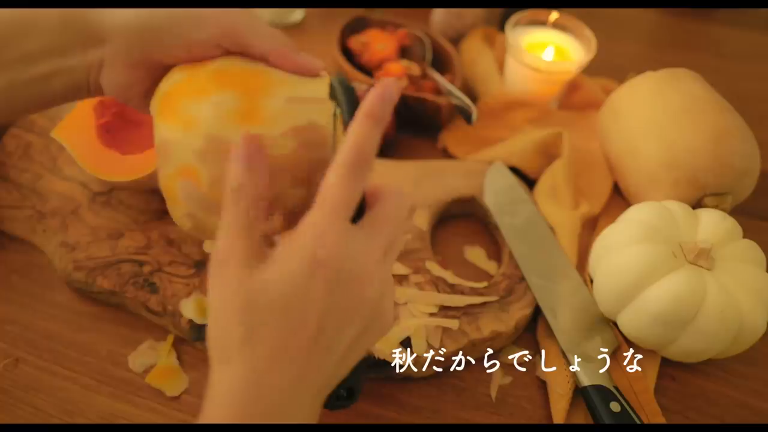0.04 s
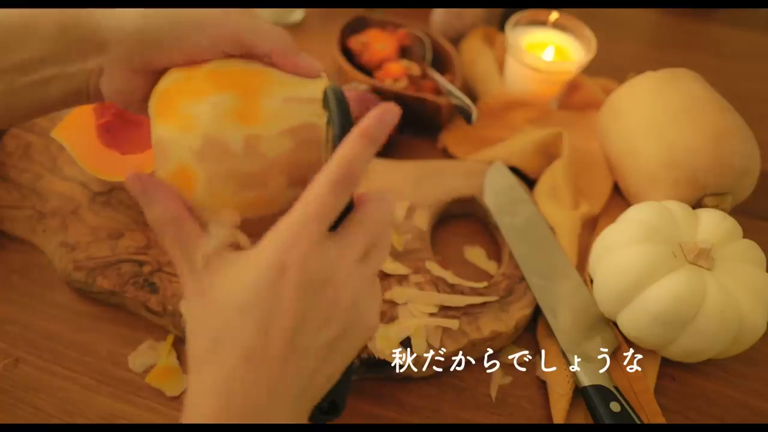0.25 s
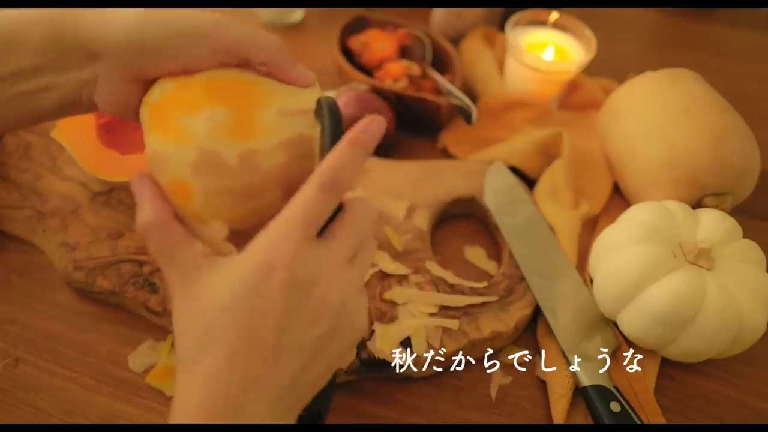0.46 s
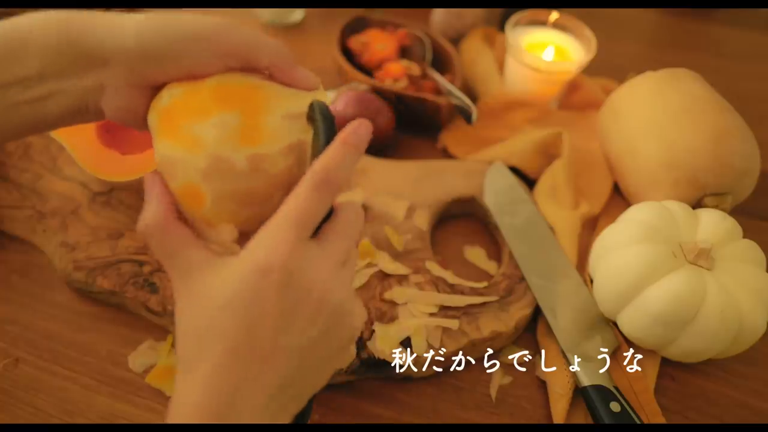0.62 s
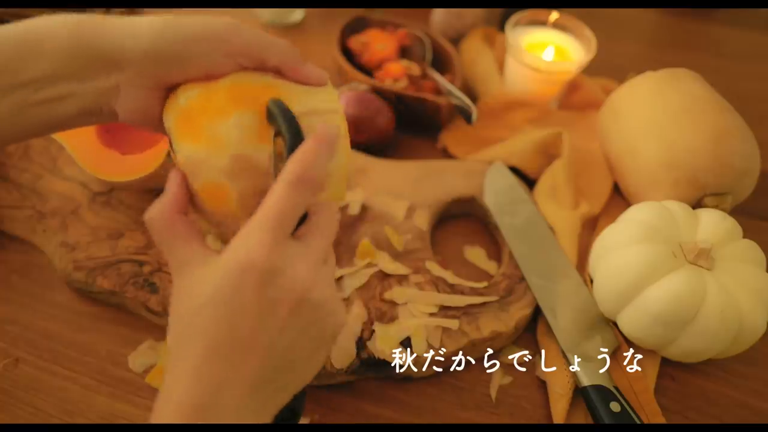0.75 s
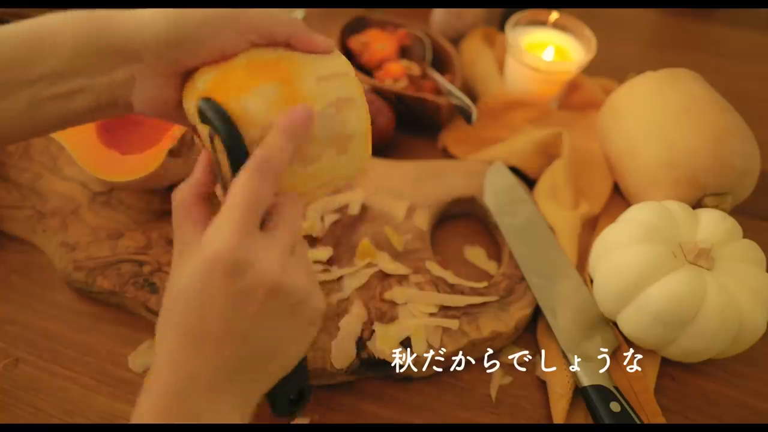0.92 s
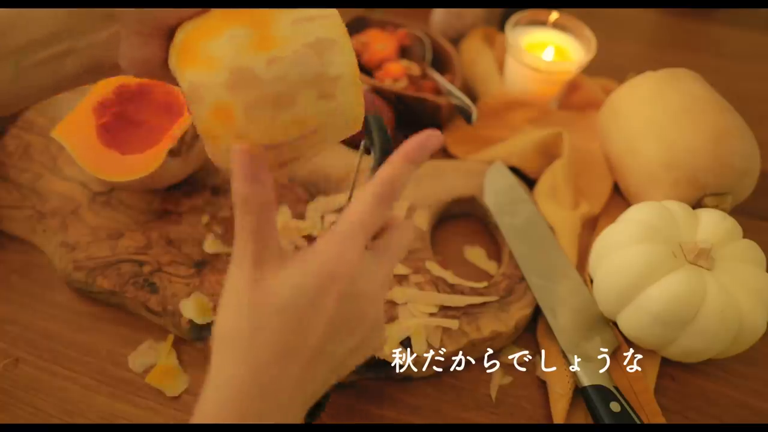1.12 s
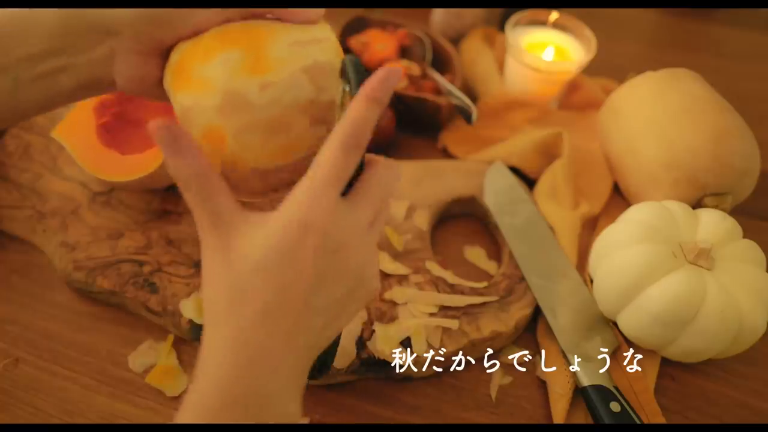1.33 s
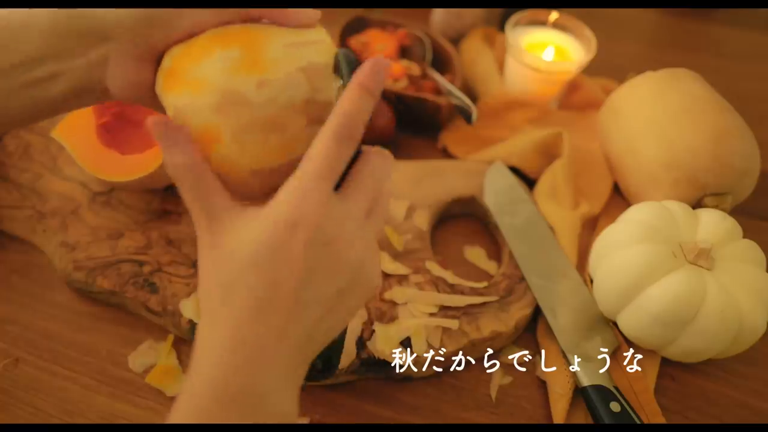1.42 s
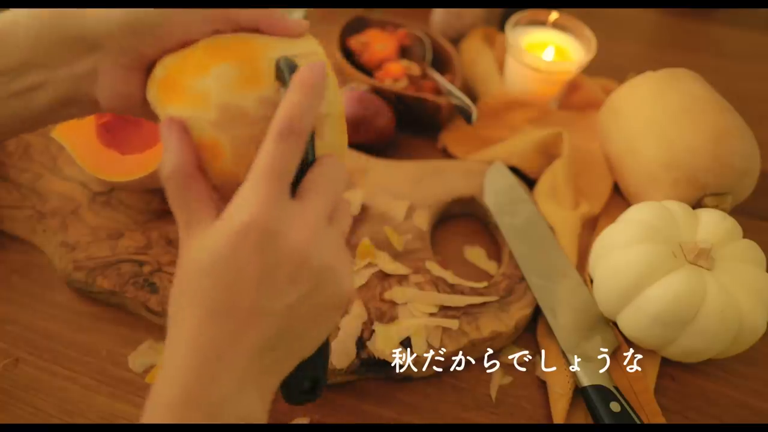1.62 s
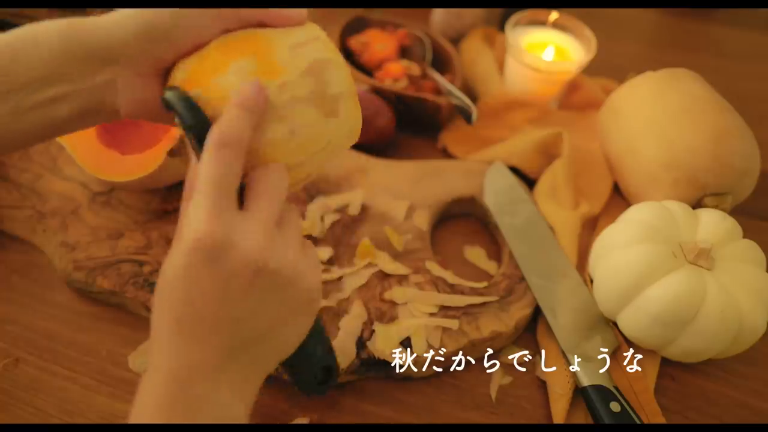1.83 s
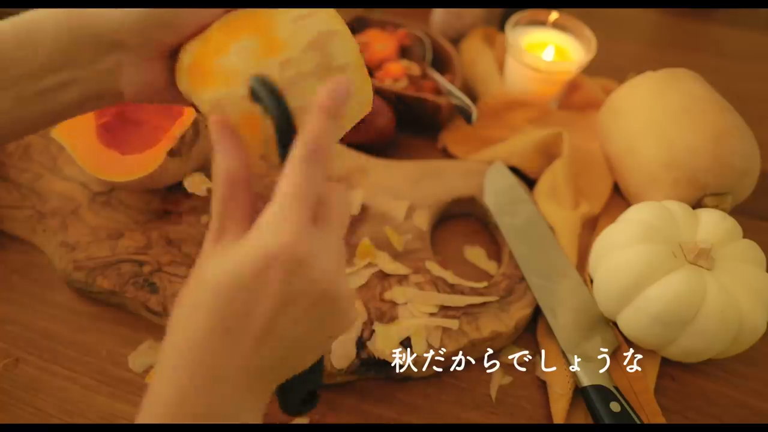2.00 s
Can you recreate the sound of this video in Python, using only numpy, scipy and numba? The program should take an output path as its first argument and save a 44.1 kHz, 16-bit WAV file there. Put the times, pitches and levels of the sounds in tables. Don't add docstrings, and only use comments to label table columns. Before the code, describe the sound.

Two short rasping strokes of a peeler on firm squash skin, close up, with small squeaks.

```python
import sys
import numpy as np
from scipy import signal
from scipy.fft import rfft, irfft
from scipy.io import wavfile
from scipy.ndimage import uniform_filter1d
from numba import njit

SR = 44100
rng = np.random.default_rng(int(sys.argv[2]) if len(sys.argv) > 2 else 0)


def pcm_store(signal):
    levels = np.round(np.clip(np.atleast_2d(signal), -1, 1) * 32767)
    wavfile.write(sys.argv[1], SR, levels.astype(np.int16).T)


def gain_from_db(level_db):
    decades = np.asarray(level_db, float) / 20
    return 10 ** decades


N = 91154

# (frequency [Hz], density [dB per Hz])
HUM_MID = [(50, -27.5), (170, -4), (375, -4.5), (500, -23.5), (680, -8), (1100, -15.5), (9000, -25),
           (16000, -28.5)]
HUM_SIDE = [(35, -30), (60, -30), (233, -7), (503, -18.5), (621, -13), (1110, -7.5), (1340, -11.5),
            (16000, -39.5)]
# (frequency [Hz], level [dB], t60 [s])
BOARD_MODES = [(309.5, 7, 0.15), (262, -7, 0.53), (347.5, -10, 0.97), (407, -6.5, 0.2)]
# (time
# [s], level [dB], centre [Hz], width [Hz], decay [s])
TICKS = [(0.034, -60.5, 10900, 8000, 0.0096), (0.078, -60, 9250, 2000, .004),
         (0.077, -60, 1587, 100, 0.021), (.208, -62.5, 10700, 3000, 0.009),
         (1.2002, -49, 11700, 9000, 0.004), (1.202, -58, 9940, 3500, 0.024),
         (1.206, -56, 13000, 8000, 0.0037), (1.242, -56, 8400, 9000, 0.0086),
         (1.256, -54, 1900, 3200, 0.004), (1.402, -51.5, 1000, 595, 0.0028),
         (1.7538, -39, 7600, 5000, .0006), (.9085, -34, 2980, 4000, 0.00065),
         (1.289, -61.5, 1780, 2000, 0.066), (1.289, -61, 250, 120, 0.1),
         (0.00076, -62.5, 6900, 14000, 0.052)]
# (start [s], length [s], level [dB], centre [Hz], width [Hz])
FLARES = [(.668, .006, -36, 6340, 900), (.673, 0.0056, -40, 10000, 4000), (.717, 0.0062, -41, 6000, 2500),
          (.718, .008, -45, 15500, 1600), (.7185, 0.0035, -34, 2480, 250), (0.725, .012, -35.5, 5960, 1200),
          (0.73, 0.0059, -37, 4270, 500), (0.74, 0.0067, -31, 2470, 200), (.79, 0.018, -58, 10400, 600),
          (.851, .006, -50, 5900, 2200), (0.885, 0.014, -49, 8800, 700), (.902, 0.02, -51, 7700, 600),
          (.902, .014, -57, 13500, 1500), (.89, 0.0092, -46.5, 1920, 150), (0.933, 0.013, -48, 1985, 150),
          (1.793, 0.023, -43.5, 6520, 300), (1.795, .03, -41, 9280, 1500), (1.79, 0.018, -52, 13500, 2500),
          (1.798, 0.026, -53, 1100, 149), (1.851, 0.0034, -35, 9300, 2800),
          (1.854, .014, -40.5, 9600, 1200), (1.866, .014, -40.5, 10850, 1200),
          (1.861, .02, -34.5, 2880, 350), (1.858, 0.024, -51, 1100, 150), (1.819, .01, -41, 1660, 150),
          (1.884, .035, -49, 2880, 120), (1.58, .014, -60, 2500, 1500), (1.653, .008, -60, 2600, 1500),
          (.668, .008, -43, 4400, 500), (.72, .016, -43, 4400, 500), (.722, .018, -41, 11500, 4000),
          (1.712, .01, -53, 1950, 300)]
# (start [s], length [s], tear [dB], squeal [dB], upper ring [dB])
SLIPS_1 = [(.543, 0.006, -46.5, -46.5, -52), (.627, 0.0047, -38, -30.5, -48),
           (.666, 0.0052, -39, -30.5, -49), (.671, 0.0049, -34, -25.5, -44), (.680, 0.0021, -44, -60, -45),
           (.716, 0.0066, -39.5, -34.5, -41.5), (.72, 0.004, -38.5, -24, -49),
           (.728, 0.005, -37.5, -28, -35), (.736, .004, -36, -36, -48), (.746, 0.011, -53, -42, -52.5),
           (.762, 0.0056, -64, -47, -59), (.796, 0.0082, -52, -49, -49), (.815, 0.0075, -65, -62, -70),
           (.85, 0.0084, -50.5, -49, -59), (.856, 0.021, -57, -51, -60), (.886, 0.011, -51, -56, -55),
           (.902, 0.017, -47.5, -58, -42), (.931, 0.012, -52, -49.5, -51.5)]
SLIPS_2 = [(1.522, 0.0093, -72, -49, -91), (1.537, 0.0036, -76, -48, -64), (1.572, 0.0093, -67, -55, -70),
           (1.588, 0.0065, -59, -52, -62), (1.612, 0.019, -62.5, -54.5, -68),
           (1.651, 0.012, -60.5, -50, -66), (1.679, 0.02, -64, -58, -75), (1.711, 0.012, -48, -47.5, -55),
           (1.746, 0.013, -48.5, -50, -55), (1.791, 0.006, -40, -39, -44.5),
           (1.802, 0.011, -37, -39.5, -46), (1.819, 0.0085, -42, -44, -52), (1.851, 0.011, -44, -35.5, -40),
           (1.860, 0.0066, -44, -47, -40), (1.869, .010, -46.5, -45.5, -39),
           (1.886, 0.027, -65, -76, -50.5)]
# (time [s], level [dB], squeal share [dB], tear share [dB])
DRAG_1 = [
    (.5, -82.5, 9, 5),
    (.59, -64, 4, 1.5),
    (.65, -63.5, -6, 1.5),
    (.7, -55, 5, 1),
    (.765, -41, -4, -6.5),
    (0.834, -48, -2.5, -6),
    (.96, -51, -3.5, -6),
    (1.02, -55.5, -7.5, -7),
    (1.15, -67, -3, -13),
]
DRAG_2 = [
    (1.48, -85, -2, -3),
    (1.54, -63.5, -6, 4.5),
    (1.6, -63.5, -3, -2.5),
    (1.7, -66.5, -5, -7),
    (1.785, -59, -11, -2),
    (1.84, -58, 3.5, 6.5),
    (1.9, -43.5, -9, -8.5),
    (1.95, -44.5, -20, -16),
    (2.06, -54.5, -18, -14.5),
]
# (centre [Hz], width [Hz], level [dB])
BLADE_1 = [(4210, 370, 1), (5650, 770, 3.5), (6470, 1100, 6.5), (7370, 1160, 6), (9940, 2700, 7),
           (14800, 8000, 1), (700, 150, -21.5), (5960, 16000, -5), (1000, 450, -7)]
BLADE_2 = [(4670, 3700, -1), (6530, 790, 7), (7800, 820, 3), (8700, 1200, 4), (9800, 950, 5),
           (10060, 1500, 6.5), (13000, 6300, 4.5), (586, 390, -17), (9100, 11000, -4)]
# (centre [Hz], width [Hz], level [dB])
RING_1 = [(2187, 82, -28), (2450, 320, -4.5), (1865, 35, -3), (2820, 760, -8), (4120, 800, -4),
          (1150, 1000, -4.5)]
RING_2 = [(1920, 24, -1.5), (2540, 400, -2), (2940, 97, -1.5), (4000, 820, 0), (1100, 130, -5.5),
          (2200, 1700, -8)]
# (time [s], pitch [Hz])
SQUEAL_1 = [(0.549, 1560), (0.631, 1615), (.675, 1590), (0.734, 1590), (.76, 1670), (.8, 1600), (1.0, 1623)]
SQUEAL_2 = [(1.52, 1536), (1.759, 1600), (1.86, 1678)]


@njit
def bandpass(x, hz, width_hz):
    y, band, low = np.empty(len(x)), 0., 0.
    g, k = np.tan(np.pi * hz / SR), width_hz / hz
    for i in range(len(x)):
        v = (band + g * (x[i] - low)) / (1 + g * (g + k))
        band, low, y[i] = 2 * v - band, low + 2 * g * v, k * v
    return y


def unit(x):
    return x / np.sqrt(np.mean(x ** 2))


def walk(rate_hz):
    hold = int(SR / rate_hz)
    steps = np.repeat(rng.standard_normal(N // hold + 1), hold)
    return unit(uniform_filter1d(uniform_filter1d(steps, hold), hold)[:N])


def noise_band(hz, width_hz):
    noise = bandpass(rng.standard_normal(N), float(hz), float(width_hz))
    return unit(bandpass(noise, float(hz), 2. * width_hz))


def slip_envelope(start_s, length_s, rise_s):
    creep_s, creep_db, sag_db, fall_s = 0.0016, -10.5, -2, 0.0038
    t = np.arange(N) / SR - start_s
    swell_s = max(rise_s, 0.25 * length_s)
    rise = np.sin(np.pi / 2 * np.clip(t / swell_s, 0, 1)) ** 2
    rise = rise + gain_from_db(creep_db) * np.exp(-np.abs(t) / creep_s)
    sag = gain_from_db(sag_db * np.clip(t / length_s, 0, 1) ** 2)
    return rise * sag * np.exp(-np.clip(t - length_s, 0, None) / fall_s)


def kitchen_hum():
    level_db, side_db, lean_left = -59.5, 1, 0.81
    hz = np.maximum(np.fft.rfftfreq(N, 1 / SR), 1)

    def spectrum(table):
        table_hz, db = np.array(table).T
        return gain_from_db(np.interp(np.log(hz), np.log(table_hz), db))

    a, b = rfft(rng.standard_normal((2, N)))
    lean = np.clip(lean_left / (1 + hz / 4000), 0, 1)
    mid = unit(irfft(a * spectrum(HUM_MID), N))
    side_noise = lean * a + np.sqrt(1 - lean ** 2) * b
    side = unit(irfft(side_noise * spectrum(HUM_SIDE), N)) * gain_from_db(side_db)
    breathing = gain_from_db(level_db + 0.17 * walk(3.2) + 0.29 * walk(12.1))
    return breathing * np.array([mid + side, mid - side])


def board_knock():
    start_s, level_db, rise_s = 1.2555, -49, 0.0026
    late = np.clip(np.arange(N) / SR - start_s, 0, None)
    out = np.zeros(N)
    for hz, db, t60_s in BOARD_MODES:
        decay = np.exp(-np.log(1000) * late / t60_s) * (1 - np.exp(-late / rise_s))
        out += gain_from_db(level_db + db) * np.sin(2 * np.pi * hz * late) * decay
    return out


def ticks():
    t, rise_s, out = np.arange(N) / SR, 0.0003, np.zeros(N)
    for start_s, db, hz, width_hz, decay_s in TICKS:
        shape = np.clip((t - start_s) / rise_s, 0, 1) * np.exp(-np.abs(t - start_s) / decay_s)
        out += gain_from_db(db) * shape * noise_band(hz, width_hz)
    return out


def flares():
    out = np.zeros(N)
    for start_s, length_s, db, hz, width_hz in FLARES:
        level = gain_from_db(db + 2.44 * walk(300))
        out += level * slip_envelope(start_s, length_s, rise_s=0.0015) * noise_band(hz, width_hz)
    return out


def resonate(x, peaks):
    out = np.zeros(N)
    for k, (hz, width_hz, db) in enumerate(peaks):
        level = gain_from_db(db + 1.5 * walk(44.43)) / np.sqrt(width_hz)
        out += (-1) ** k * level * bandpass(x, float(hz), float(width_hz))
    return unit(out)


def blade_chatter(pitch_track):
    partner_ratio, partner_db = 1.085, -7.5
    pitch_hz = np.interp(np.arange(N) / SR, *np.array(pitch_track).T)
    phase = 2 * np.pi * np.cumsum(pitch_hz * (1 + 0.004 * walk(90))) / SR
    main = np.sqrt(2) * np.sin(phase) * gain_from_db(1.2 * walk(200))
    return main + gain_from_db(partner_db + 4.2 * walk(60.4)) * np.sin(partner_ratio * phase)


def peeler_stroke(slips, drag, blade, ring, pitch_track):
    squeal_hz, squeal_width_hz, chatter_share = 1600., 168., 0.8
    build_s, drag_ring_db = 0.0015, -7
    t = np.arange(N) / SR
    drag_s, drag_db, squeal_share_db, tear_share_db = np.array(drag).T
    pull = gain_from_db(np.interp(t, drag_s, drag_db, left=-120, right=drag_db[-1] - 20))
    drag_squeal = pull * gain_from_db(np.interp(t, drag_s, squeal_share_db))
    drag_tear = pull * gain_from_db(np.interp(t, drag_s, tear_share_db))

    shapes = np.array([slip_envelope(s[0], s[1], rise_s=0.0041) for s in slips])
    tear, squeal, upper = gain_from_db(np.array(slips)[:, 2:]).T @ shapes
    keep = np.exp(-1 / (build_s * SR))
    squeal = signal.lfilter([1 - keep], [1, -keep], squeal)

    crack_db = 2 * rng.exponential(size=N) + 2 * 0.68 * walk(400)
    cracks = rng.standard_normal(N) * gain_from_db(crack_db)
    chatter = blade_chatter(pitch_track)
    rung = bandpass(cracks, squeal_hz, squeal_width_hz)
    rung = unit(bandpass(rung, 1.095 * squeal_hz, 2.5 * squeal_width_hz))
    squeal_tone = np.sqrt(chatter_share) * chatter + np.sqrt(1 - chatter_share) * rung
    frame = bandpass(bandpass(cracks, 2310., 1900.), 2430., 2800.)

    return ((tear + drag_tear) * resonate(cracks, blade)
            + squeal * squeal_tone + drag_squeal * rung
            + (upper + pull * gain_from_db(drag_ring_db)) * resonate(frame, ring))


def scene():
    pan_db, room_db, room_t60_s = 3.5, -13, 0.62
    glint_s, glint_db = 0.0006, -12
    near = (peeler_stroke(SLIPS_1, DRAG_1, BLADE_1, RING_1, SQUEAL_1)
            + peeler_stroke(SLIPS_2, DRAG_2, BLADE_2, RING_2, SQUEAL_2)
            + flares() + ticks() + board_knock())

    t = np.arange(SR // 2) / SR
    tail = rng.standard_normal((2, len(t))) * np.exp(-np.log(1000) * t / room_t60_s) * (t > 0.002)
    tail = tail / np.sqrt(np.sum(tail[0] ** 2))
    wet = signal.fftconvolve(near[None], tail, axes=1)[:, :N]

    bounce = np.roll(bandpass(near, 13000., 6300.), int(glint_s * SR))
    glint = gain_from_db(glint_db) * bounce * np.array([[1], [-1]])
    pan = gain_from_db(np.array([[pan_db], [-pan_db]]) / 2) - 1
    lean = bandpass(near, 1700., 6500.) * pan
    return near + glint + lean + gain_from_db(room_db) * wet + kitchen_hum()


def roll_off(x):
    return signal.sosfilt(signal.butter(12, 16810, fs=SR, output="sos"), x)


def record(dry):
    top_hz, top_leak_db = 15800, -33
    sos = signal.ellip(8, 0.1, 40, top_hz, fs=SR, output="sos")
    low = signal.sosfiltfilt(sos, dry)
    mix = low + gain_from_db(top_leak_db) * (dry - low)
    return roll_off(mix)


dry = scene()
out = record(dry)
pcm_store(out)
```